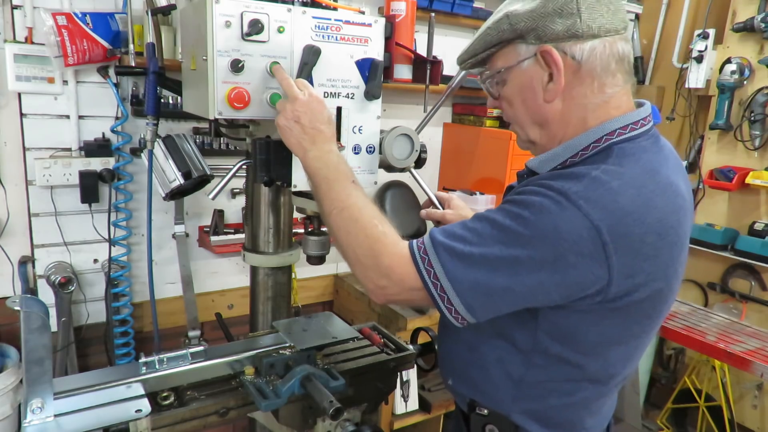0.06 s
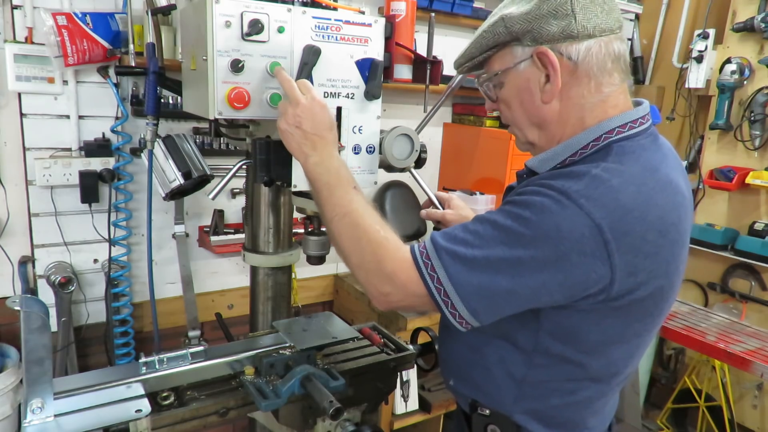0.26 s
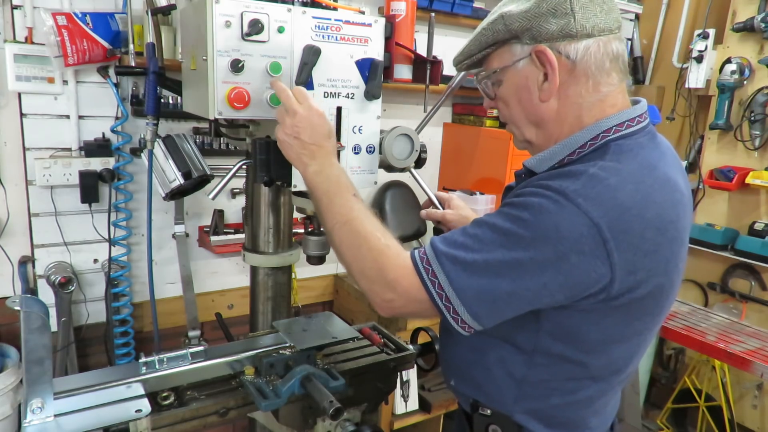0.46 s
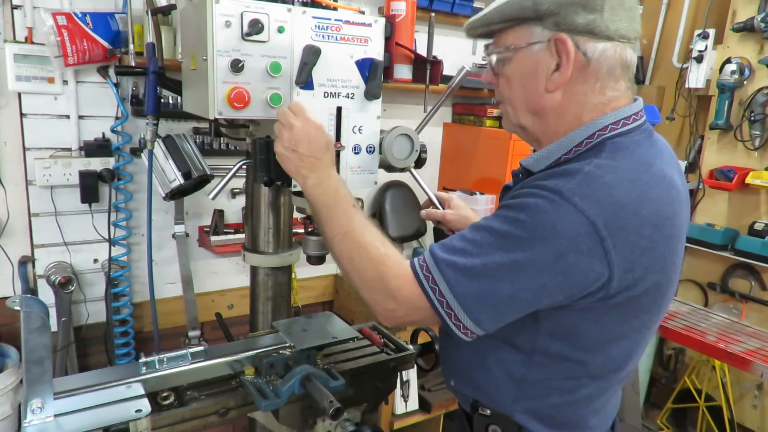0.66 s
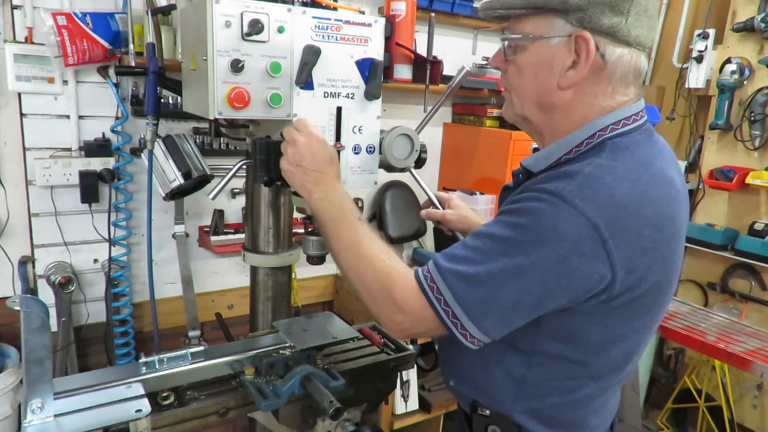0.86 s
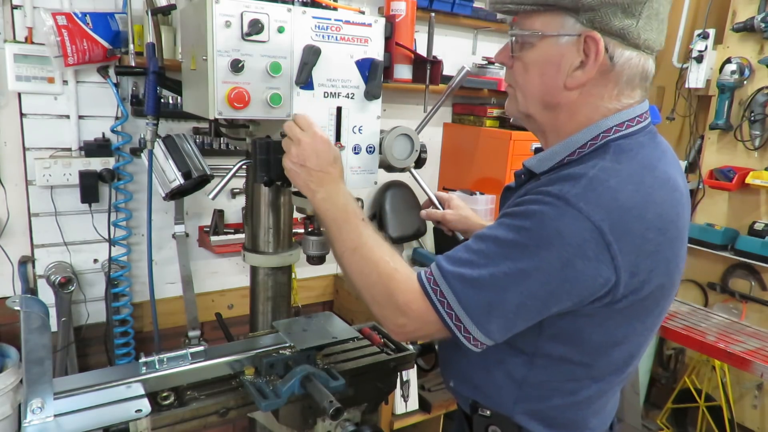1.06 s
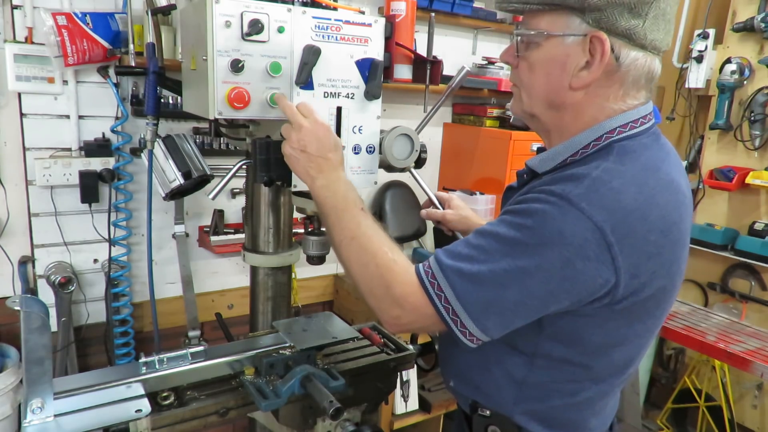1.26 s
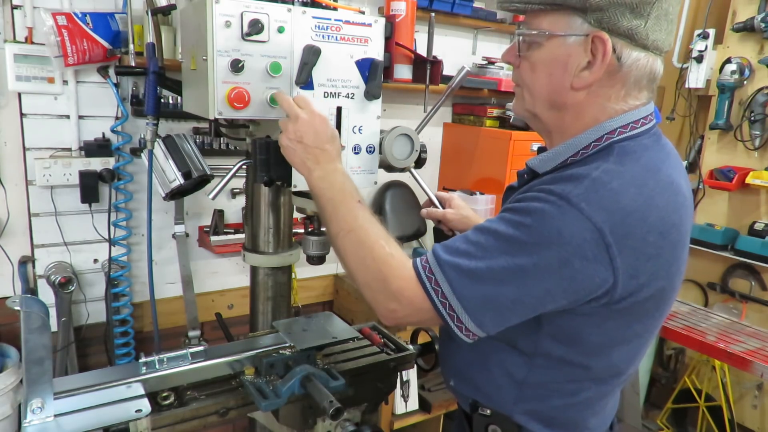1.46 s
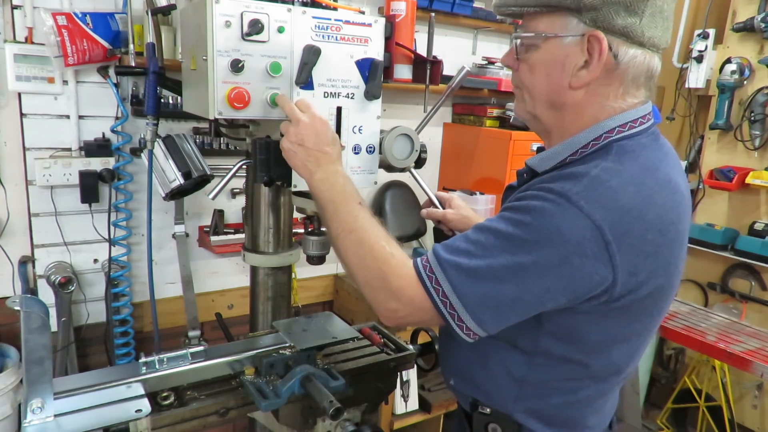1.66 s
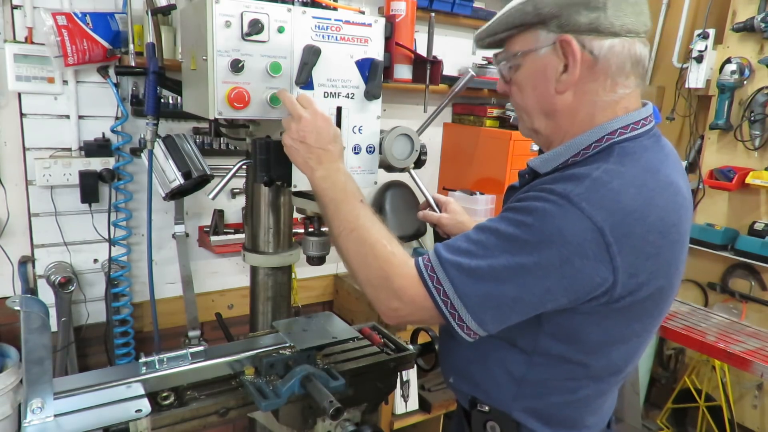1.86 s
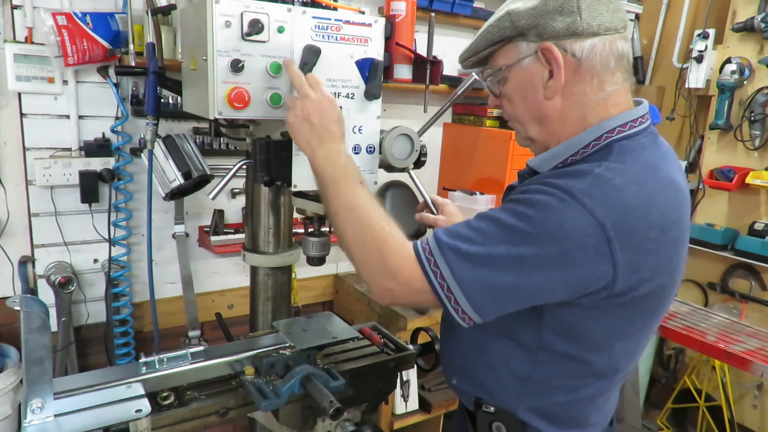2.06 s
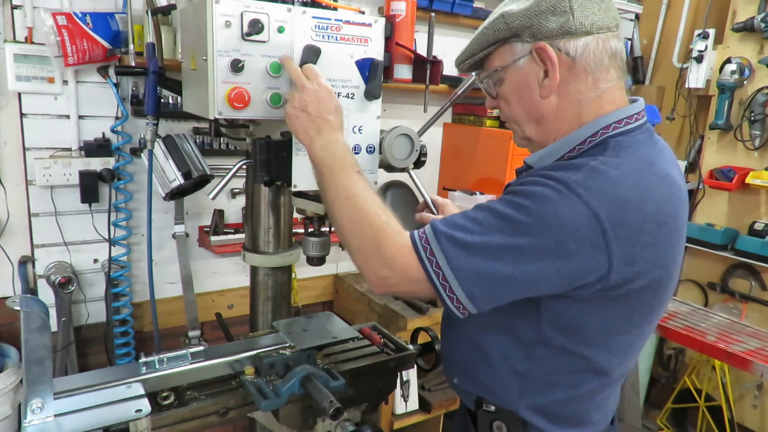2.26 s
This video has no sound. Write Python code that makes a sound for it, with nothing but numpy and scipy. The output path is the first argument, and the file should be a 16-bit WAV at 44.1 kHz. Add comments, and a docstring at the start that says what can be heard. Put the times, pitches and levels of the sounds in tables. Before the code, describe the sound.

Two quick metallic clacks of a milling machine's switch, followed by gears rattling to a stop.

```python
"""A milling machine is jogged in a small workshop: its contactor slams shut and drops out a tenth of a second later,
ringing the steel control cabinet. The motor jolts, then coasts to rest with its gears rattling.
The push button ticks and clicks faintly over the steady room noise."""
import sys
import numpy as np
from scipy import signal
from scipy.fft import rfft, irfft, next_fast_len
from scipy.io import wavfile

SR = 44100
rng = np.random.default_rng(int(sys.argv[2]) if len(sys.argv) > 2 else 0)


def pcm_store(signal):
    """Save signal as 16-bit PCM."""
    levels = np.round(np.clip(np.atleast_2d(signal), -1, 1) * 32767)
    wavfile.write(sys.argv[1], SR, levels.astype(np.int16).T)


N = 101429

# contactor blows: (s, level dB, armature 0 = pulls in, 1 = drops out)
BLOWS = [(0.2028, -18, 0), (0.2064, -14.2, 0), (0.2108, -16.2, 0), (0.2286, -28.5, 0), (0.3112, -15.3, 1), (0.3192, -19, 1), (0.3298, -23, 1)]  # fixed
# clack of the armature: (Hz, dB per Hz pulling in, dB per Hz dropping out)
CLACK = [(90, -52, -53), (137, -14, 1.5), (292, -11, -7), (450, -14.5, -15), (720, -5.5, -7.5), (904, -15, -6), (1150, 4.5, -2), (1360, -11.5, -4), (1424, 5, 5.5),
         (1780, -10, -6), (2070, -1.5, -4.5), (2260, -10, -6.5), (3120, -15.5, -9), (3400, -22, -14), (5350, -22, -16.5), (7660, -41, -24), (13500, -47, -36), (15500, -62, -58)]
CLACK_T60_S, CLACK_ATTACK_S = 0.085, .0003  # fixed
# after-ring of the panels and the workshop: (Hz, t60 s)
PANEL_T60 = [(120, 0.061), (400, 0.84), (1400, 0.52), (3200, 0.71), (4200, 0.48), (6500, 0.39), (9000, 0.33), (14000, 0.33)]
# cabinet modes: (Hz, dB pulling in, dB dropping out, t60 s)
CABINET = [(135, -35, -31.5, .16), (394, -42, -19.5, .33), (496, -27, -42, .45), (682, -20, -42, .3), (813, -62, -44.5, 2.3), (1022, -32, -32, .35), (1136, -22, -40, .3),  # fixed
           (1218, -26, -40, .35), (1378, -46, -39, 1.3), (1414, -25, -40, .35), (1447, -19.5, -32, .22),  # fixed
           (1490, -24, -27, .3), (1608, -30, -42, .7), (1983, -31, -44, .6), (2062, -30, -33, .4), (3335, -53, -44, 1)]  # fixed
# bright snaps of the contacts and the button spring: (s, level dB)
SNAPS = [(0.183, -51), (0.1891, -39), (0.1948, -38.5), (0.1969, -30), (0.295, -47), (0.301, -35), (0.3108, -34.5), (0.4913, -55), (0.501, -50.5)]
# (Hz, dB per Hz)
SNAP_COLOUR = [(60, -40.5), (350, -2), (3000, 2), (6000, -1), (9500, -7), (13500, -7), (15500, -30)]
SNAP_T60_S, SNAP_ROOM_DB, SNAP_ROOM_T60_S = 0.042, 0, 0.18
# motor: (s, gear rattle dB, rumble dB)
MOTOR = [(0.167, -74, -54), (0.197, -28, -54), (0.28, -22.5, -44), (0.38, -32, -43), (0.46, -35.5, -57), (0.52, -32.5, -44.5), (0.61, -33, -49.5), (0.674, -42.5, -60), (0.781, -45, -56.5), (0.89, -55.5, -66), (1.05, -66, -61)]
# gearbox: (Hz, dB per Hz)
GEARBOX = [(40, -40), (295, -18), (345, -0.5), (600, -1.5), (780, -10.5), (1000, -8), (1500, -6.5), (1800, -12.5), (2050, -9.5), (2400, -15.5), (3300, -21.5), (3650, -26.5), (6400, -36), (8000, -48.5), (15000, -76.5)]
# motor frame: (Hz, dB per Hz)
RUMBLE = [(25, -40), (60, -6), (100, -23.5), (138, 2), (200, -10.5), (260, -1), (500, -51.5)]
KNOCKS_PER_S, KNOCK_T60_S, KNOCK_SPREAD_DB = 96, 0.6, 3.5
GEAR_STEADY, GEAR_SIDE_DB = 0.94, -17.5
# small ticks and knocks of button, gears and handle: (s, level dB, pitch Hz, t60 s)
TICKS = [(0.047, -44.5, 2030, 0.028), (0.161, -41, 1930, 0.049), (0.579, -35, 389.4, 0.21), (1.068, -58, 3150, 0.059), (1.131, -52.5, 2750, 0.052), (1.172, -50.5, 643, 0.12), (2.2394, -43, 1950, 0.015)]
# the button's metallic click: (s, level dB)
CLICKS = [(1.9872, -51), (1.9905, -50), (2.0117, -57)]  # fixed
# (Hz, width Hz, dB)
BUTTON = [(1880, 67, 10), (4500, 94, 6), (5300, 340, -5), (7050, 420, -0.5), (8050, 600, -4), (12700, 3300, -16)]
CLICK_T60_S, CLICK_ROOM_DB = .065, -13  # fixed
# room noise: (Hz, dB per Hz)
AIR = [(25, -11), (62, -1.5), (100, -5.5), (150, -1), (250, -5.5), (420, -3.5), (560, -6.5), (650, -1), (800, -10), (2700, -19), (6000, -28.5), (13500, -38.5), (15500, -50)]
# stereo spread of the machine's sound: (Hz, side dB)
SPREAD = [(120, -32), (600, -26), (1400, -14), (3500, -11.5), (7000, -7.5), (13000, -1.5)]
DIRECT_SIDE_DB = -4
TOP_HZ = 15700  # fixed
TICK_T60_S = None
TICK_WIDTH, TICK_ROOM_DB, TICK_ROOM_T60_S = 0.39, -14, 0.37
# stereo width of the room noise: (Hz, side dB)
AIR_SIDE = [(60, -7), (110, -7.5), (200, 5.5), (380, 8), (700, 0), (1300, 3.5), (14000, -0.5)]
AIR_DB = -55
AIR_SIDE_DB = None
CABINET_DB, CABINET_ATTACK_S = 2.5, 0.00081
RIPPLE_DB, RIPPLE_STEP = 3, .008  # fixed
# while the coil is live the contacts sizzle twice a mains cycle: (Hz, dB per Hz)
SIZZLE = [(800, -29), (2800, 11), (6000, -2.5), (12500, -9.5), (15000, -28)]
SIZZLE_DB, SIZZLE_DEPTH = -37, 0.11
MAINS_HZ = 50  # fixed
# resonances of the gearbox, above its broad spectrum: (Hz, width Hz, dB)
GEAR_RING = [(690, 16, 11), (1380, 34, 6), (1606, 16, 7), (1983, 16, 9), (2600, 40, 5), (3325, 60, 8)]  # fixed
# soft scuffs of finger and sleeve: (s, level dB)
SCUFFS = [(0.038, -50.5), (1.128, -56.5), (2.06, -59)]
# (Hz, dB per Hz)
SCUFF_COLOUR = [(500, -27), (2300, 5), (5000, -3.5), (8000, -19.5), (14000, -19)]
SCUFF_ATTACK_S, SCUFF_T60_S = 0.004, 0.4
LOW_CUT_HZ = 40  # fixed
PANEL_DB = -9
PANEL_ATTACK_S = .004  # fixed


def amp(db):
    """Decibels to gain."""
    return 10 ** (np.asarray(db) / 20)


def unit(x):
    """Scale to rms 1."""
    return x / np.sqrt(np.mean(x ** 2) + 1e-20)


def along(points, hz):
    """(Hz, value) points on a log axis."""
    f, v = np.transpose(points)
    return np.interp(np.log(hz + 1), np.log(f + 1), v)


def filtered(x, response):
    """x times a response of frequency."""
    m = next_fast_len(x.shape[-1] + 8192)  # fixed
    return irfft(rfft(x, m) * response(np.fft.rfftfreq(m, 1 / SR)), m)[..., :x.shape[-1]]


def colour(points):
    """The response of a (Hz, dB) table."""
    return lambda hz: amp(along(points, hz))


def resonances(rows):
    """The response of (Hz, width Hz, dB) resonances."""
    return lambda f: sum((-1) ** k * amp(db) * 1j * f * w / (c * c - f * f + 1j * f * w) for k, (c, w, db) in enumerate(rows))


def noise(response, size=N):
    """Two unrelated coloured noises (mid, side) of rms 1."""
    return unit(filtered(rng.standard_normal((2, size)), response))


def spread(pair, side_db=0):
    """Mid and side to left and right: narrow in the bass, wide in the treble."""
    side = amp(side_db) * filtered(pair[1], colour(SPREAD))
    return np.array([pair[0] + side, pair[0] - side])


def add(out, s, sound):
    """Mix a sound in at time s."""
    part = out[:, max(round(s * SR), 0):][:, :sound.shape[-1]]
    part += sound[..., :part.shape[1]]


def burst(response, t60, attack=.0006, side_db=0):  # fixed
    """A crowd of close modes, struck together and dying at one rate."""
    t = np.arange(SR) / SR
    envelope = amp(-60 * t / t60) * (1 - np.exp(-t / attack))
    pair = noise(response, size=SR) * envelope
    return spread(pair * np.linalg.norm(envelope) / np.linalg.norm(pair, axis=1, keepdims=True), side_db)


def after_ring(response):
    """Dense ringing: the deep bass dies quickest, the low mids linger longest, the treble in between."""
    hz, t, z = signal.stft(noise(response), SR, nperseg=256)  # fixed
    tail = signal.istft(z * amp(-60 * t / along(PANEL_T60, hz)[:, None]), SR)[1][:, :N]
    return spread(tail) * (1 - np.exp(-np.arange(N) / SR / PANEL_ATTACK_S))


def contactor(fine):
    """The armature hits and bounces; each blow clacks and shakes the panels."""
    out = np.zeros((2, N))
    for s, db, drops in BLOWS:
        response = colour(np.array(CLACK)[:, [0, 1 + round(drops)]])
        add(out, s, amp(db) * burst(response, CLACK_T60_S, CLACK_ATTACK_S, DIRECT_SIDE_DB))
        add(out, s, amp(db + PANEL_DB) * after_ring(lambda hz: response(hz) * fine(hz)))
    return out


def cabinet():
    """The first blow of each stroke sets the cabinet's clear modes ringing."""
    out, t = np.zeros((2, N)), np.arange(N) / SR
    for stroke in range(2):
        start = min(s for s, db, drops in BLOWS if round(drops) == stroke)
        for hz, *db, t60 in CABINET:
            phase = rng.uniform(0, 2 * np.pi) + rng.normal(0, 0.28, (2, 1))
            add(out, start, amp(CABINET_DB + db[stroke] - 60 * t / t60) * np.sin(2 * np.pi * hz * t + phase) * (1 - np.exp(-t / CABINET_ATTACK_S)))
    return out


def snaps(fine):
    """Contacts and spring snap brightly."""
    out, response = np.zeros((2, N)), lambda hz: colour(SNAP_COLOUR)(hz) * fine(hz)
    for s, db in SNAPS:
        add(out, s, amp(db) * (burst(response, SNAP_T60_S, side_db=DIRECT_SIDE_DB) + amp(SNAP_ROOM_DB) * burst(response, SNAP_ROOM_T60_S)))
    return out


def motor(fine):
    """Loose gear teeth knock unevenly over the rumble of the frame until the spindle stops."""
    t = np.arange(N) / SR
    s, rattle_db, rumble_db = np.transpose(MOTOR)
    knocks = (rng.random(N) < KNOCKS_PER_S / SR) * amp(KNOCK_SPREAD_DB * rng.standard_normal(N))
    shake = unit(np.sqrt(np.abs(signal.fftconvolve(knocks ** 2, amp(-60 * t / KNOCK_T60_S) ** 2)[:N])))
    housing = lambda hz: colour(GEARBOX)(hz) * np.sqrt(fine(hz)) * np.hypot(1, np.abs(resonances(GEAR_RING)(hz)))
    mid, side = noise(housing) * unit(shake + GEAR_STEADY)
    gears = mid + amp(GEAR_SIDE_DB) * np.array([side, -side])
    return gears * amp(np.interp(t, s, rattle_db, left=-120, right=-120)) + spread(noise(colour(RUMBLE))) * amp(np.interp(t, s, rumble_db, left=-120, right=-120))


def handling():
    """Light ticks and knocks with one resonance each, and the button's brighter click."""
    out, t = np.zeros((2, N)), np.arange(SR) / SR
    for s, db, hz, t60 in TICKS:
        body = lambda f: resonances([(hz, TICK_WIDTH * hz, 0)])(f) ** 2
        tone = amp(-60 * t / t60) * np.sin(2 * np.pi * hz * t)
        add(out, s, amp(db) * (tone + burst(body, t60) + amp(TICK_ROOM_DB) * burst(body, TICK_ROOM_T60_S, side_db=-13)))
    for s, db in CLICKS:
        body = resonances(BUTTON)
        add(out, s, amp(db) * (burst(body, CLICK_T60_S) + amp(CLICK_ROOM_DB) * burst(body, TICK_ROOM_T60_S, side_db=2)))
    return out


def room_noise():
    """A steady, wide hush."""
    mid, side = noise(colour(AIR))
    side = filtered(side, colour(AIR_SIDE))
    return amp(AIR_DB) * np.array([mid + side, mid - side])


def ripple():
    """The fine peaks and dips of the machine's many close resonances."""
    knots = rng.standard_normal(2048)  # fixed
    return lambda hz: amp(RIPPLE_DB * np.interp(np.log1p(hz / 1000) / RIPPLE_STEP, np.arange(len(knots)), knots))  # fixed


def sizzle(fine):
    """A bright mains buzz that lasts from pull-in to drop-out."""
    t = np.arange(N) / SR
    live = (t > BLOWS[0][0]) & (t < min(s for s, db, drops in BLOWS if round(drops)))
    return amp(SIZZLE_DB) * live * (1 + SIZZLE_DEPTH * np.sin(2 * np.pi * 2 * MAINS_HZ * t)) * spread(noise(lambda hz: colour(SIZZLE)(hz) * fine(hz)))


def scuffs():
    """Finger and sleeve brush the panel."""
    out = np.zeros((2, N))
    for s, db in SCUFFS:
        add(out, s, amp(db) * burst(colour(SCUFF_COLOUR), SCUFF_T60_S, SCUFF_ATTACK_S, side_db=0))
    return out


def scene():
    """Everything at the camera; the panels' after-ring, the snaps, the sizzle and the gear rattle all pass
    through the same fine resonances."""
    fine = ripple()
    return contactor(fine) + cabinet() + snaps(fine) + sizzle(fine) + motor(fine) + handling() + scuffs() + room_noise()


def record(dry):
    """The camera thins the deep bass and keeps nothing above its band limit."""
    return filtered(dry, lambda hz: (hz < TOP_HZ) * (1j * hz / (LOW_CUT_HZ + 1j * hz)) ** 2)


dry = scene()
out = record(dry)
pcm_store(out)
```